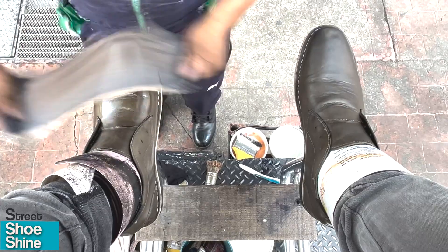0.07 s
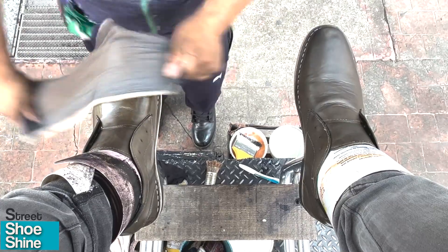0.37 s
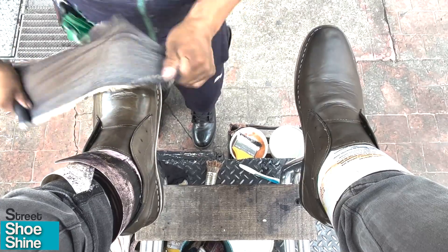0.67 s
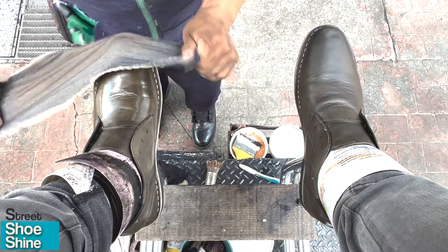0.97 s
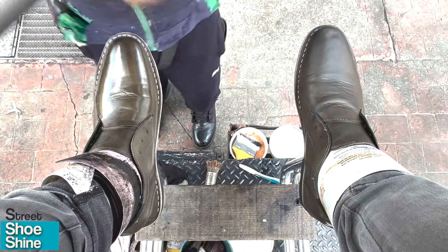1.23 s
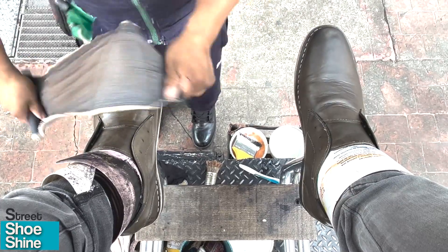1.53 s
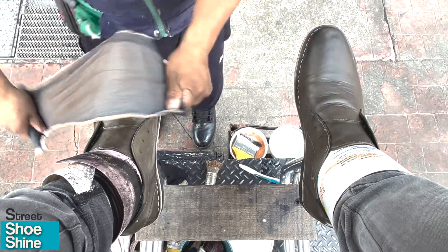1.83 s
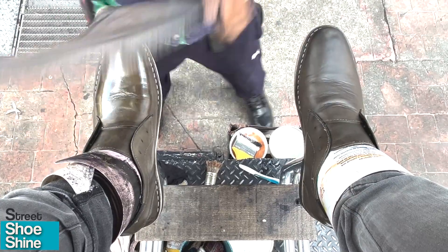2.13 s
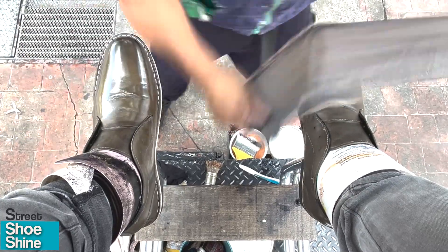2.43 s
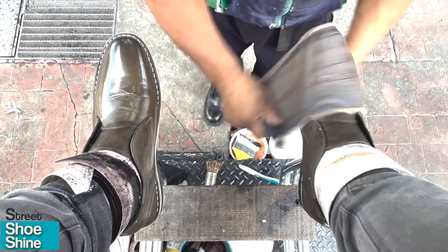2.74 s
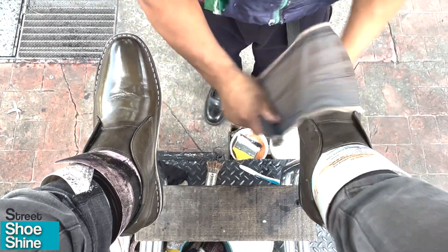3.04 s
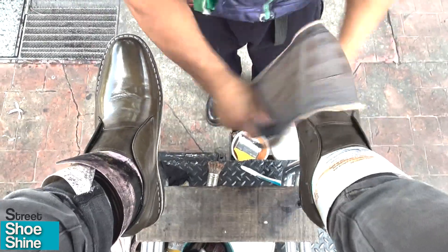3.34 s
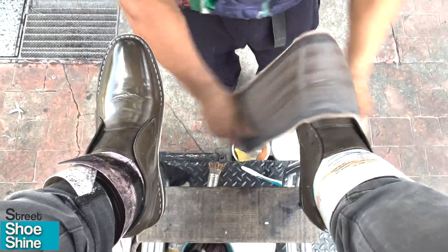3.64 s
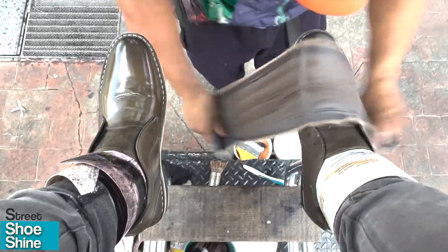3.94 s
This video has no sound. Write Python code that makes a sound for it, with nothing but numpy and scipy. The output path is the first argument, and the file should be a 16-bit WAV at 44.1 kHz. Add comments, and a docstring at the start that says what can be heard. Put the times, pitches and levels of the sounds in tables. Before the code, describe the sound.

A cloth buffs a leather shoe close by in quick, light swishes, about seven a second, snapping sharply at 0.3 seconds and louder at 1.4. After a short pause, firmer strokes on the other shoe run from 2.4 to 4 seconds, with brief high squeaks and a few light knocks around 3.6. Street traffic rumbles throughout; an engine hum fades by 2 seconds as a car gathers speed.

```python
"""A taut cloth is pulled to and fro over one leather shoe, then the other, hissing by sliding friction.
Slapped on the toe, it snaps twice. Where a stroke turns, the leather squeaks by stick-slip,
and the tugged shoe knocks lightly on its rest. Pavement and house fronts return a short echo.
Behind, traffic rumbles, an engine hums and a car gathers speed."""
import sys
import numpy as np
from scipy import signal
from scipy.fft import rfft, irfft, next_fast_len
from scipy.io import wavfile
from scipy.ndimage import map_coordinates

SR = 44100
rng = np.random.default_rng(int(sys.argv[2]) if len(sys.argv) > 2 else 0)


def wav_record(signal):
    """Record a signal, one row per channel, as 16-bit PCM in the file named by sys.argv[1]."""
    frames = np.transpose(np.atleast_2d(signal))
    bounded = np.clip(frames, -1, 1)
    # unit amplitude maps onto the largest positive 16-bit level
    quanta = np.round(bounded * 32767).astype(np.int16)
    wavfile.write(sys.argv[1], SR, quanta)


N = 176400

# Strokes of the cloth: (start [s], length [s], hiss [dB], rub [dB], fastest point [fraction of stroke])
LEFT_STROKES = [(-.005, 0.13, -48.5, -52, .45), (0.287, 0.12, -44, -44, 0), (0.414, .14, -50.5, -48, 0.6),
                (0.565, 0.13, -49, -47.5, 0.34), (0.693, 0.15, -53, -51.5, 0.5),
                (0.829, 0.15, -60, -53, 0.5), (.98, 0.12, -56.5, -54, 0.6), (1.106, 0.1, -58, -59, .65),
                (1.386, .15, -44, -47, -0.1), (1.533, 0.15, -48.5, -51.5, .5),
                (1.687, 0.14, -45.5, -48.5, 0.33), (1.816, .17, -49, -49, .5),
                (1.967, 0.19, -53.5, -52, 0.63)]
# (start [s], length [s], hiss [dB], rub [dB], fastest point [fraction of stroke], resonance [dB])
RIGHT_STROKES = [(2.415, 0.14, -40, -54.5, 0.3, -69), (2.556, 0.14, -41, -44.5, 0.64, -71),
                 (2.718, 0.13, -39, -40, 0.37, -44), (2.86, 0.14, -42.5, -44, 0.35, -45),
                 (3.012, 0.14, -41.5, -40.5, 0.33, -61), (3.15, 0.14, -43.5, -44.5, 0.4, -39.5),
                 (3.302, 0.15, -42, -43, 0.27, -44), (3.444, .134, -40, -44, 0.33, -40),
                 (3.586, 0.13, -41.5, -41, 0.38, -48), (3.717, 0.13, -42, -42.5, 0.44, -41),
                 (3.856, 0.14, -40.5, -41, 0.31, -50.5)]
# Noise spectra: (frequency [Hz], level [dB])
HISS_SPECTRUM = [(3000, -2.5), (6000, -3.5), (8500, -2.5), (11500, 1.5), (13500, -1), (16000, -2.5)]  # fibres on polish
LEFT_RUB_SPECTRUM = [(200, -22), (600, -9), (1500, 1), (2600, -2), (3900, 1), (5500, -8), (9000, -6)]
RIGHT_RUB_SPECTRUM = [(200, -1.5), (600, -4.5), (1100, 1), (1800, 0.5), (2300, 0.5), (2900, 3), (3700, -2),
                      (5000, -5.5), (9000, -26)]
SLAP_SPECTRUM = [(60, -29), (250, 8.5), (420, -2), (580, 2), (850, -5.5), (1300, -1.5), (2000, -8.5),
                 (3200, -27), (4500, -26), (8000, -54), (16000, -35)]
FLUTTER_SPECTRUM = [(300, -19), (1200, 1), (3100, 2), (5500, -8), (9000, -5), (16000, -14)]
TAP_SPECTRUM = [(200, -1), (500, 6), (1300, -5), (2800, -8), (4500, -29), (12000, -28)]
TRAFFIC_SPECTRUM = [(20, -24), (35, -12.5), (50, 1), (75, 2), (105, 3), (135, -5.5), (200, -8.5),
                    (290, -8.5), (350, -13.5), (430, -20), (700, -23), (1300, -24), (2200, -31),
                    (3500, -39), (6000, -48), (10000, -56), (16000, -53.5)]
# Snaps of the cloth: (time [s], swish [dB], crack [dB], slap [dB], flutter [dB],
# thump [dB], thump frequency [Hz], thump delay [s])
SNAPS = [(0.2722, -43, -12, -15.5, -23.5, -9, 227, 0.00157),
         (1.3578, -43, -1.5, -9.5, -32.5, -19, 126, 0.0086)]
# Squeaks of the leather: (time [s], pitch [Hz], whistle [dB], partials [dB])
SQUEAKS = [(.002, 6850, -54.5, -66), (0.292, 7120, -37.5, -32.5), (.56, 6900, -56, -66),
           (1.395, 6860, -44.5, -41.5), (2.554, 6950, -39, -39), (2.862, 7320, -33, -44.5),
           (3.157, 7320, -30.5, -61), (3.449, 7290, -32, -61), (3.721, 7270, -20, -52)]
# Partials beside the whistle: (frequency [Hz], level [dB])
SQUEAK_MODES = [(2850, -16.5), (4060, -2.5), (11100, -15.5)]
# Knocks of the shoe on its rest: (time [s], ring [dB], pitch [Hz], tap [dB])
KNOCKS = [(2.442, -47, 590, -32), (3.559, -19.5, 533, -31), (3.7298, -28.5, 898, -25),
          (3.758, -23.5, 594, -27)]
# Modes of the ring: (frequency [multiple of pitch], level [dB], t60 [s])
KNOCK_MODES = [(0.998, -3, 0.041), (2.45, -10.5, 0.017)]
# Envelopes of the traffic and the engine: (time [s], level [dB])
TRAFFIC_LEVEL = [(0, -31.5), (.7, -34), (1.3, -35), (1.9, -34.5), (2.4, -34.5), (3.2, -34.5), (4, -34)]
ENGINE_LEVEL = [(0, -37), (.7, -35), (1.35, -38), (1.8, -48.5), (2.4, -53.5), (4, -61)]
# Partials of the hum: (order [multiple of ENGINE_HZ], level [dB])
ENGINE_ORDERS = [(2, -10.5), (3, -2.5), (4, -13.5), (5, -11), (5.68, -1.5), (6, -1), (7.5, -25.5)]
# Exhaust tone of a passing car: (time [s], frequency [Hz], level [dB])
EXHAUST = [(0, 74, -42), (1.7, 79.55, -43), (2.15, 82.14, -30), (2.5, 84, -30), (2.8, 90.06, -36.5),
           (3.3, 97, -35), (4, 108, -49)]
# Stereo phase of each shoe: (frequency [Hz], phase lead of the left channel [rad]); above 8 kHz both shoes
# follow one common phase course
LEFT_PHASE = [(350, 0), (700, 2.2), (1300, 3.4), (3000, 3.6), (4200, 6), (5200, 9.4), (6200, 11.1),
              (8300, 9.4), (9700, 8.2), (11100, 6.4), (12400, 6.2), (15200, 3.2)]
RIGHT_PHASE = [(400, 0), (700, -1.2), (2100, -.2), (3000, 1.4), (4100, 6.2), (4800, 6.8), (5400, 3.7),
               (6500, 5), (8300, 3.1), (9700, 1.9), (11100, .1), (12400, 0), (15200, -3.1)]
# (frequency [Hz], coherence of the channels [0-1])
LEFT_COHERENCE = [(300, 0.93), (700, 0.32), (2500, 0.2), (3600, 0.37), (5200, 0.14), (8200, 1),
                  (10000, 0.91), (12000, 0.76), (15000, 1)]
RIGHT_COHERENCE = [(300, 0.38), (1000, 0.16), (1800, 1), (2800, 0.81), (3700, 0.12), (6300, 0.53),
                   (8200, 1), (10000, 0.78), (12000, 0.89), (15000, 1)]
# (frequency [Hz], left minus right channel [dB])
LEFT_BALANCE = [(400, -2), (1900, -3), (3400, 0.5), (5000, 7.5), (8000, -1)]
RIGHT_BALANCE = [(400, 5), (1400, -2.5), (2700, -5), (3700, 1.5), (6000, -0.2), (8000, -0.5)]
# A place is three such tables: phase, coherence, balance
LEFT, RIGHT = (LEFT_PHASE, LEFT_COHERENCE, LEFT_BALANCE), (RIGHT_PHASE, RIGHT_COHERENCE, RIGHT_BALANCE)
TOE = ([(400, .1), (1000, 0.84), (2400, 4.2), (4500, 9.8), (6200, 9.1), (8300, 9.7), (11500, 8.2),
       (15200, 3.2)], [(300, 1), (1000, 0.47), (5000, 0.13), (9000, 0.85)], [(200, 0), (700, -1.2),
       (4400, 1), (12000, -0.67)])
# Reverberation time of the street: (frequency [Hz], t60 [s])
ECHO_DECAY = [(150, 0.35), (1000, 0.26), (4000, 0.26), (12000, 0.033)]
# Treble loss of the echo: (frequency [Hz], gain [dB])
ECHO_COLOUR = [(4500, 0), (9000, -10)]

SWEEP_FROM_HZ, SWEEP_TO_HZ, SWEEP_WIDTH_HZ = 1200, 2337, 520  # resonance of the cloth
SQUEAK_PEAK_S, SQUEAK_LAG_S, SQUEAK_BEND = .013, 0.0053, 0.019
STROKE_ECHO_DB, SHARP_ECHO_DB = -11, -16
ENGINE_HZ = 49.67
TOP_HZ = 15800


def left_shoe():
    """Sliding friction: in light strokes, hiss and rub grow as powers of the cloth's speed."""
    hiss, rub = np.zeros((2, N))
    for start, length, hiss_db, rub_db, fastest in LEFT_STROKES:
        on, speed, _ = pull(start, length, fastest)
        hiss[on] += amp(hiss_db) * speed ** 1.86
        rub[on] += amp(rub_db) * speed ** 1.27
    flicker = amp(0.92 * wobble(70))
    fibres = hiss * noise(HISS_SPECTRUM, LEFT, grain_db=1)
    return flicker * (fibres + rub * noise(LEFT_RUB_SPECTRUM, LEFT, grain_db=0.5))


def right_shoe():
    """Friction and resonance: in firmer strokes, a narrow band of noise climbs along each pull."""
    hiss, rub, ring, progress = np.zeros((4, N))
    for start, length, hiss_db, rub_db, fastest, ring_db in RIGHT_STROKES:
        on, speed, elapsed = pull(start, length, fastest)
        progress[on] = elapsed
        grip = np.tanh((speed / 0.68) ** 2)
        hiss[on] += amp(hiss_db) * grip * speed ** 0.27
        rub[on] += amp(rub_db) * np.tanh(speed / 0.65)
        ring[on] += amp(ring_db) * speed ** 3.1
    phase = phase_of(SWEEP_FROM_HZ + (SWEEP_TO_HZ - SWEEP_FROM_HZ) * progress + 70 * wobble(25))
    sweep = unit(wobble(SWEEP_WIDTH_HZ) * np.sin(phase) + wobble(SWEEP_WIDTH_HZ) * np.cos(phase))
    body = rub * noise(RIGHT_RUB_SPECTRUM, RIGHT, grain_db=4.5) + ring * placed(sweep, RIGHT)
    flicker = amp(0.73 * wobble(70))
    return flicker * (hiss * noise(HISS_SPECTRUM, RIGHT, grain_db=1.5) + body)


def pull(start, length, fastest):
    """Reciprocating motion: one stroke's samples, speed (a skewed half sine) and elapsed fraction."""
    elapsed = (clock() - start) / length
    on = (elapsed > 0) & (elapsed < 1)
    skewed = np.interp(elapsed[on], [0, np.clip(fastest, .05, .95), 1], [0, .5, 1])
    return on, np.abs(np.sin(np.pi * skewed)), elapsed[on]


def snaps():
    """Impulsive excitation: the cloth swishes, flutters, cracks taut, slaps and thumps the toe."""
    air = noise(HISS_SPECTRUM, LEFT)
    flutter = noise(FLUTTER_SPECTRUM, TOE, grain_db=6)
    slap = noise(SLAP_SPECTRUM, TOE, grain_db=2.5)
    out, pulses = np.zeros((2, N)), np.zeros(N)
    for start, swish_db, crack_db, slap_db, flutter_db, thump_db, thump_hz, delay in SNAPS:
        t = clock() - start
        out += amp(swish_db) * swell(t + 0.032, peak_s=0.017, sharp=1.7) * air
        out += amp(flutter_db) * swell(t + 0.01, peak_s=0.0026, sharp=0.34) * flutter
        out += amp(slap_db) * burst(t - .002, rise=.003, t60=.048) * slap
        high = swell(t + 0.00055, peak_s=0.00046, sharp=2.3) * sine(2300, t)
        low = swell(t + 0.00038, peak_s=0.00056, sharp=2.4) * sine(850, t + 0.00025)
        pulses += amp(crack_db) * (0.55 * high - 1.21 * low)
        thump = swell(t - delay + 0.0021, peak_s=0.0094, sharp=3.3) * sine(thump_hz, t - delay - .002)
        pulses += amp(thump_db) * thump
    lead_s = np.array([[.00015], [-.00015]])  # the left channel hears the pulses first
    return out + filtered(pulses, lambda hz: np.exp(2j * np.pi * hz * lead_s))


def squeaks():
    """Stick-slip oscillation: as a stroke sets off, a whistle bends up to pitch and partials follow."""
    t, out = clock(), np.zeros(N)
    jitter, flicker = wobble(600), amp(2.5 * wobble(300))
    partials = sum(amp(db) * np.sin(phase_of(hz + 95 * wobble(600))) for hz, db in SQUEAK_MODES)
    for start, hz, whistle_db, partials_db in SQUEAKS:
        on = (t > start) & (t < start + .1)
        age = t[on] - start
        phase = phase_of(hz * (1 - SQUEAK_BEND * np.exp(-age / 0.0024) + 0.0095 * jitter[on]))
        whistle = np.sin(phase) + amp(-26) * np.sin(2 * phase)
        out[on] += amp(whistle_db) * swell(age, SQUEAK_PEAK_S, sharp=3.4) * whistle
        out[on] += amp(partials_db) * swell(age - SQUEAK_LAG_S, peak_s=0.014, sharp=5.8) * partials[on]
    return placed(out * flicker, RIGHT)


def knocks():
    """Damped modal vibration: the tugged shoe taps its rest and gives a short hollow ring."""
    rings, taps = np.zeros((2, N))
    for start, ring_db, hz, tap_db in KNOCKS:
        t = np.maximum(clock() - start, 0)
        attack = 1 - np.exp(-t / 0.00025)
        modes = sum(amp(db - 60 * t / t60) * sine(hz * ratio, t) for ratio, db, t60 in KNOCK_MODES)
        rings += amp(ring_db) * attack * modes
        taps += amp(tap_db - 60 * t / 0.033) * attack
    return placed(rings, RIGHT) + taps * noise(TAP_SPECTRUM, RIGHT, grain_db=3)


def street_echo(x):
    """Reverberation: reflections from pavement and house fronts die away, the treble soonest."""
    hz, t, bands = signal.stft(rng.standard_normal((2, SR // 2)), SR, nperseg=256)
    decay = amp(-60 * t / along(ECHO_DECAY, hz)[:, None])
    tail = signal.istft(bands * decay, SR, nperseg=256)[1]
    echo = signal.fftconvolve(x, tail / np.linalg.norm(tail[0]), axes=1)[:, :N]
    return filtered(echo, lambda hz: amp(along(ECHO_COLOUR, hz)))


def traffic():
    """Incoherent summation: many vehicles merge into a low, gently wavering noise."""
    level_db, = curves(TRAFFIC_LEVEL)
    return amp(level_db + 0.63 * wobble(8.36)) * noise(TRAFFIC_SPECTRUM, LEFT)


def engine():
    """Engine orders: partials at multiples of one wavering rate make a hum that fades."""
    level_db, = curves(ENGINE_LEVEL)
    turn = phase_of(ENGINE_HZ * (1 + 0.00716 * wobble(6.13)))
    hum = sum(amp(db + 2.35 * wobble(9.05)) * np.sin(order * turn + .5 * wobble(15))
              for order, db in ENGINE_ORDERS)
    return amp(level_db) * hum


def exhaust():
    """Periodic pulsation: the exhaust's low tone rises as a car gathers speed."""
    hz, level_db = curves(EXHAUST)
    return amp(level_db + 0.83 * wobble(20)) * np.sin(phase_of(hz) + 0.98 * wobble(20))


def noise(spectrum, place, grain_db=0):
    """Partial coherence: mid and side noise, clumped into grains, form a stereo signal of rms 1."""
    def mid_side_gains(hz):
        """Constant-power law: coherence divides the spectrum between mid and side."""
        angle = np.arccos(np.clip(along(place[1], hz), 0, 1)) / 2
        return amp(along(spectrum, hz)) * [np.cos(angle), np.sin(angle)]
    grains = rng.standard_normal((2, N)) * amp(grain_db * wobble(1500))
    mid, side = filtered(grains, mid_side_gains)
    return unit(placed(np.array([mid + side, mid - side]), place))


def placed(x, place):
    """Localisation: the channels differ in phase and level, less and less below 600 Hz."""
    phase, _, balance = place

    def response(hz):
        """Antisymmetry: each channel takes half of the difference."""
        half = np.array([[.5], [-.5]]) * np.minimum(hz / 600, 1) ** 2
        return amp(half * along(balance, hz)) * np.exp(1j * half * along(phase, hz))
    return filtered(x, response)


def filtered(x, response):
    """Linear filtering: the spectrum of x times a complex frequency response."""
    size = next_fast_len(N + 8192)
    return irfft(rfft(x, size) * response(np.fft.rfftfreq(size, 1 / SR)), size)[..., :N]


def burst(t, rise, t60):
    """Exponential growth up to t = 0, then exponential decay."""
    return np.exp(np.minimum(t, 0) / rise) * amp(-60 * np.maximum(t, 0) / t60)


def swell(t, peak_s, sharp):
    """Gamma envelope: a hump that starts at t = 0 and tops at peak_s."""
    u = np.maximum(t, 0) / peak_s
    return (u * np.exp(1 - u)) ** sharp


def wobble(rate):
    """Random modulation: a smooth curve with rate knots a second."""
    return map_coordinates(rng.standard_normal(int(N * rate / SR) + 4), [clock() * rate])


def along(points, hz):
    """Interpolation of (frequency [Hz], value) points on a logarithmic axis."""
    frequencies, values = np.transpose(points)
    return np.interp(np.log(hz + 1), np.log(frequencies + 1), values)


def curves(rows):
    """Linear interpolation in time of each column after the first."""
    times, *columns = np.transpose(rows)
    return [np.interp(clock(), times, column) for column in columns]


def phase_of(hz):
    """Phase as the time integral of frequency."""
    return 2 * np.pi * np.cumsum(hz) / SR


def sine(hz, t):
    """Simple harmonic motion."""
    return np.sin(2 * np.pi * hz * t)


def amp(db):
    """Amplitude ratio of a level in decibels."""
    return 10 ** (np.asarray(db) / 20)


def unit(x):
    """Normalisation to rms 1."""
    return x / np.sqrt(np.mean(x ** 2) + 1e-20)


def clock():
    """Uniform sampling: the time of each sample in seconds."""
    return np.arange(N) / SR


def scene():
    """Superposition of the strokes, their sharp sounds, the echo of both and the street."""
    strokes = left_shoe() + right_shoe()
    sharp = snaps() + squeaks() + knocks()
    echo = street_echo(amp(STROKE_ECHO_DB) * strokes + amp(SHARP_ECHO_DB) * sharp)
    return strokes + sharp + echo + traffic() + engine() + exhaust()


def record(dry):
    """Band limiting: nothing above TOP_HZ passes."""
    return filtered(dry, lambda hz: hz < TOP_HZ)


dry = scene()
out = record(dry)
wav_record(out)
```